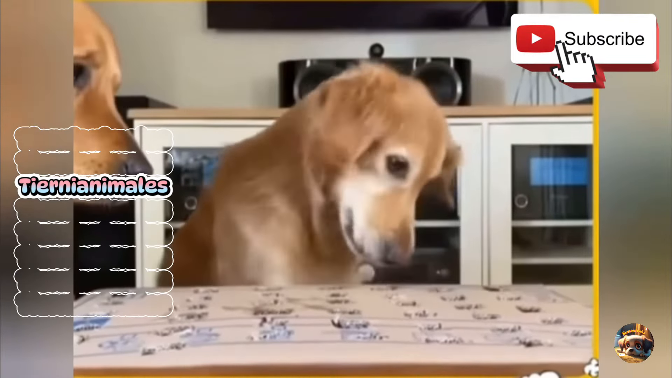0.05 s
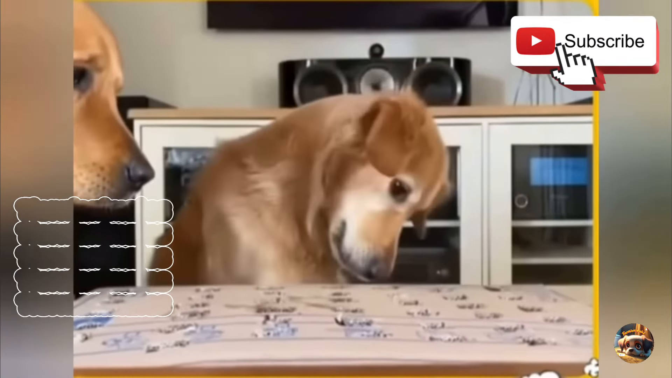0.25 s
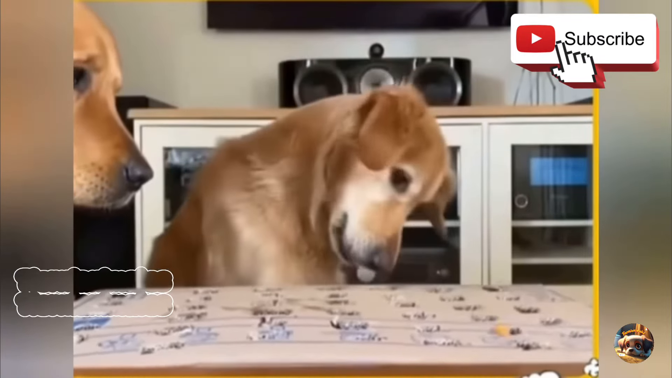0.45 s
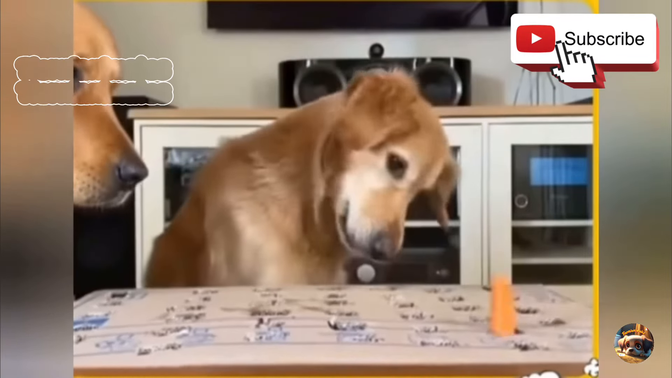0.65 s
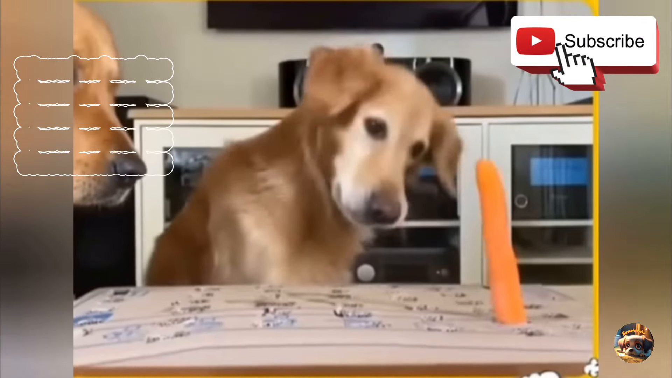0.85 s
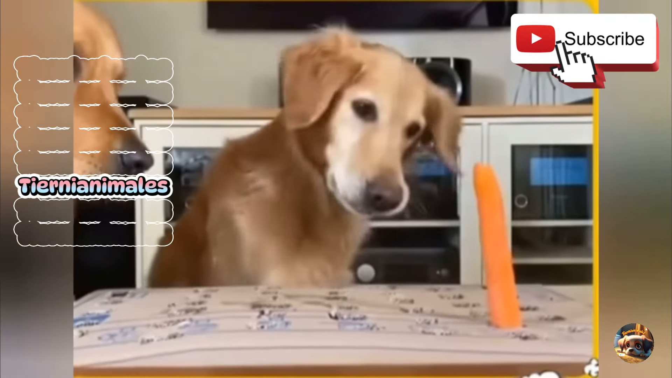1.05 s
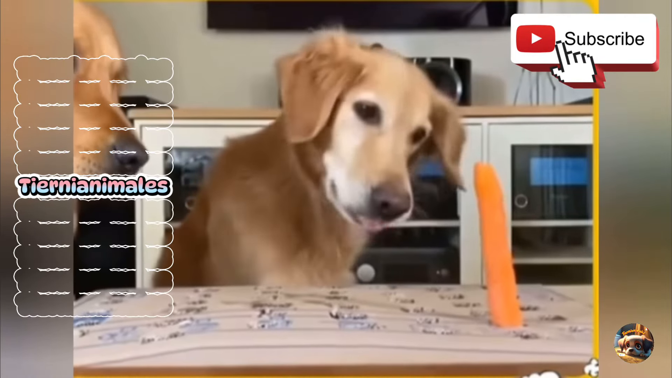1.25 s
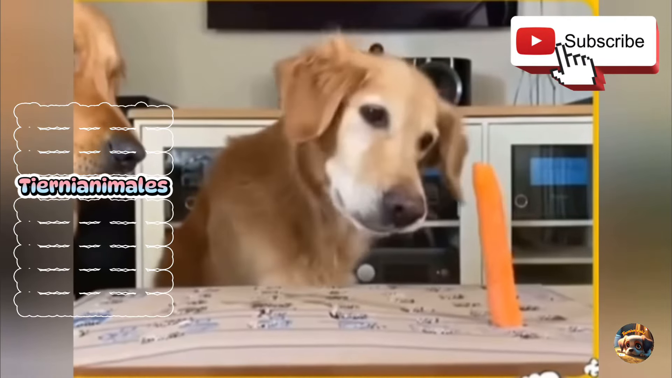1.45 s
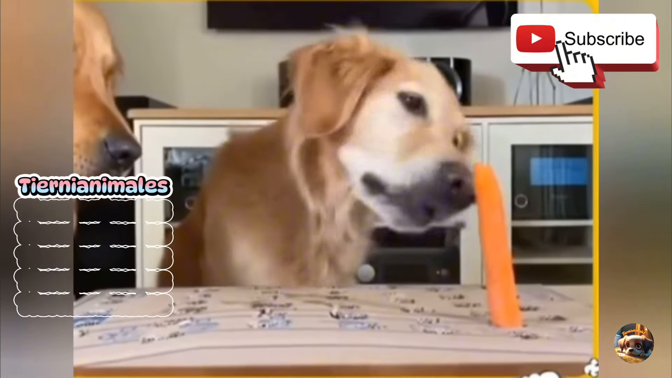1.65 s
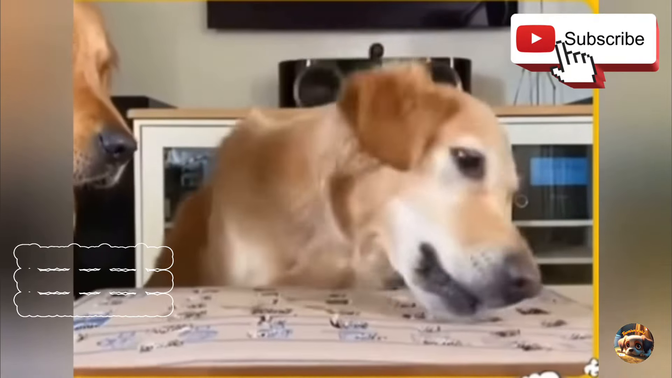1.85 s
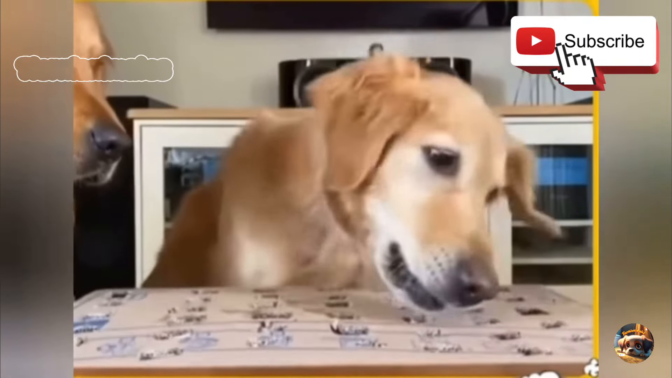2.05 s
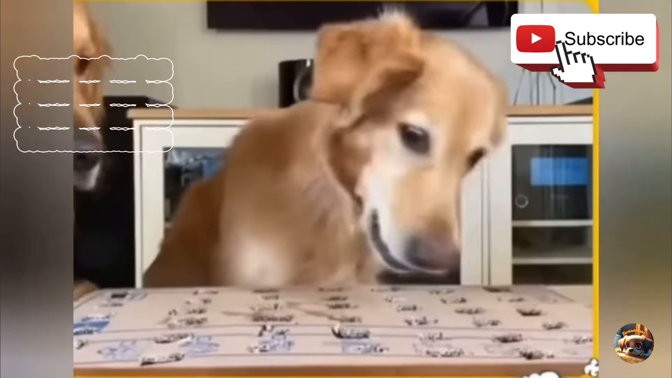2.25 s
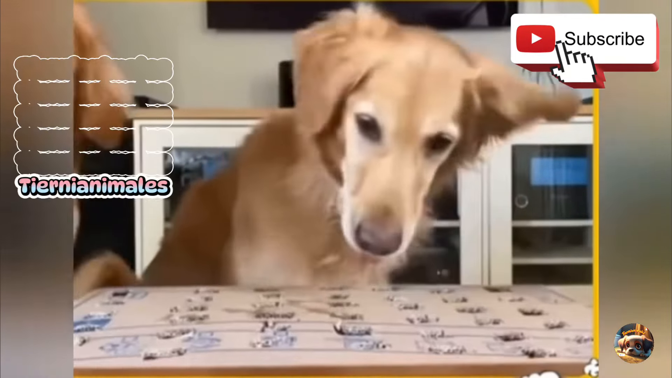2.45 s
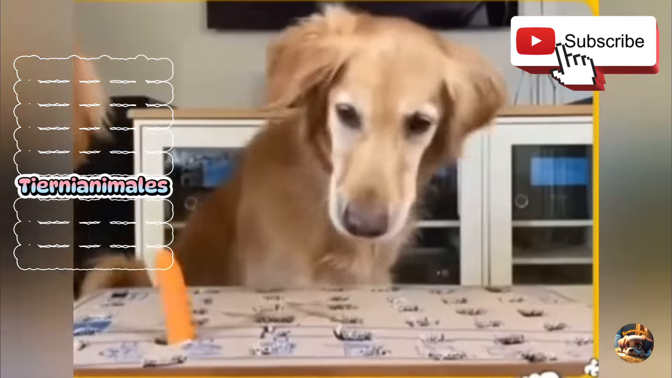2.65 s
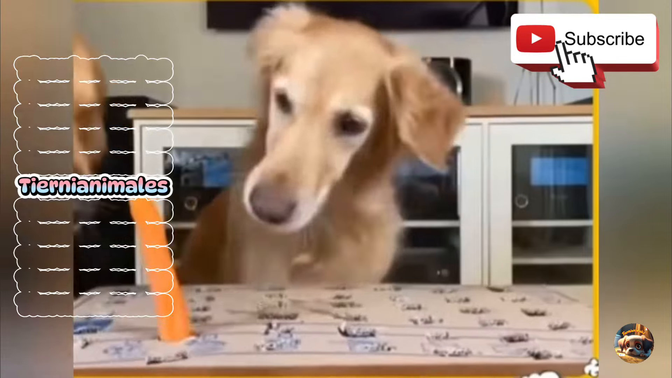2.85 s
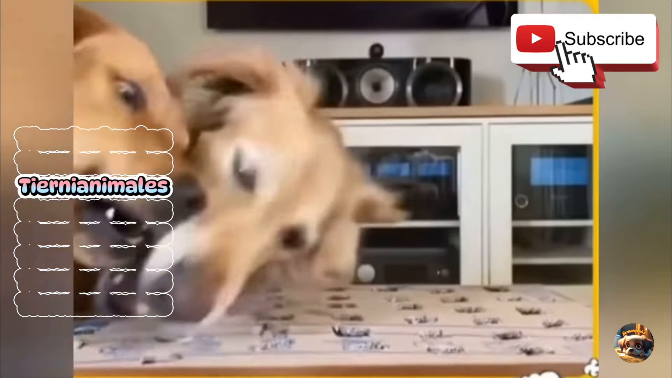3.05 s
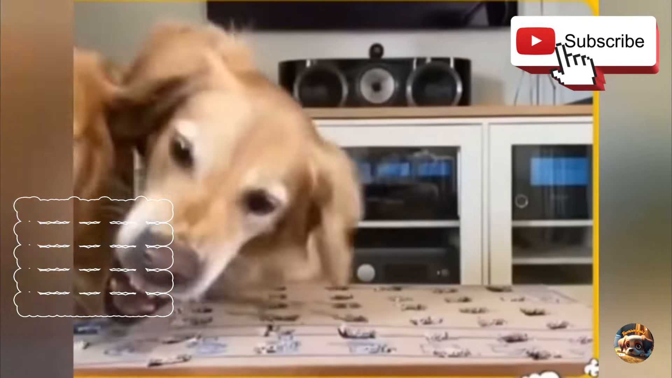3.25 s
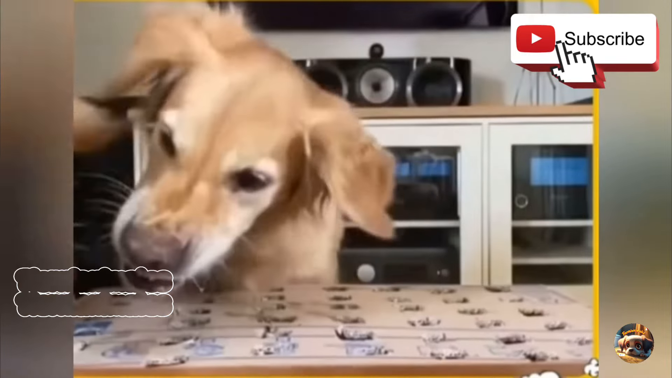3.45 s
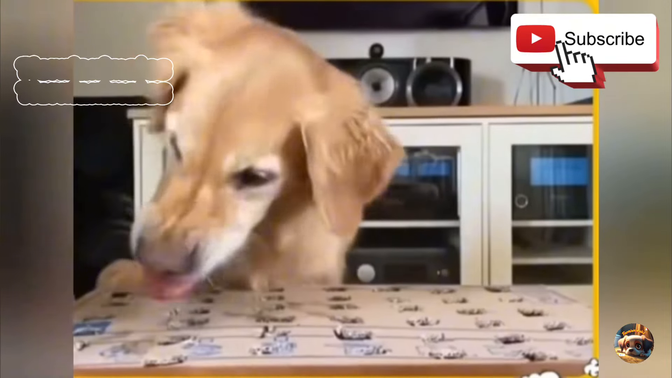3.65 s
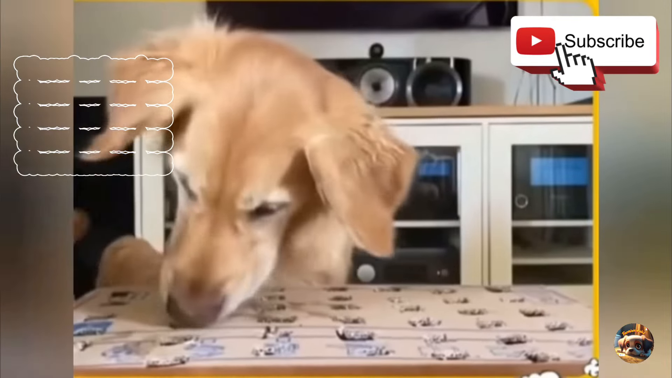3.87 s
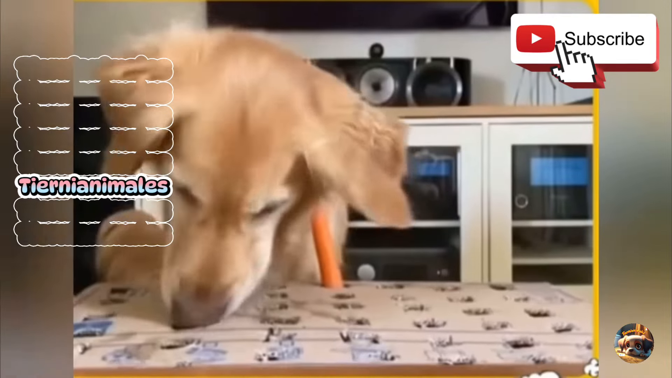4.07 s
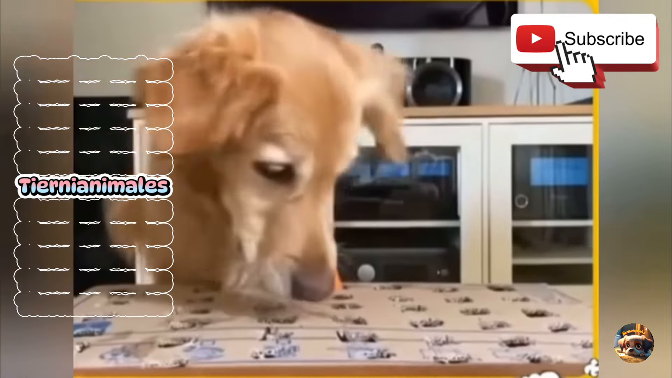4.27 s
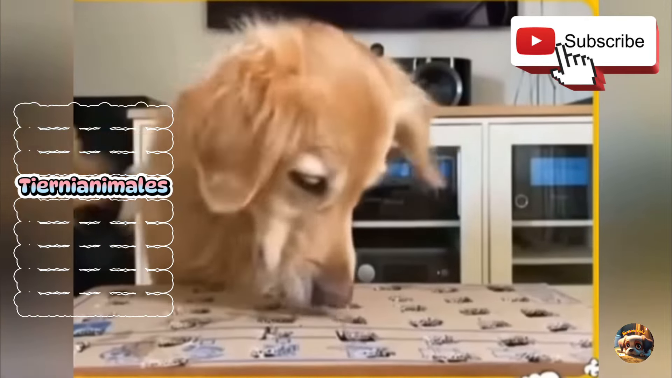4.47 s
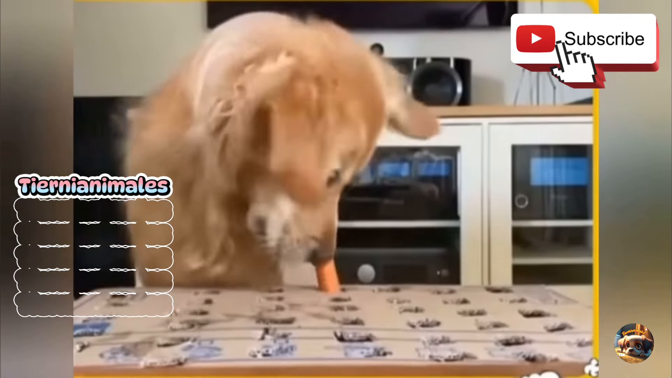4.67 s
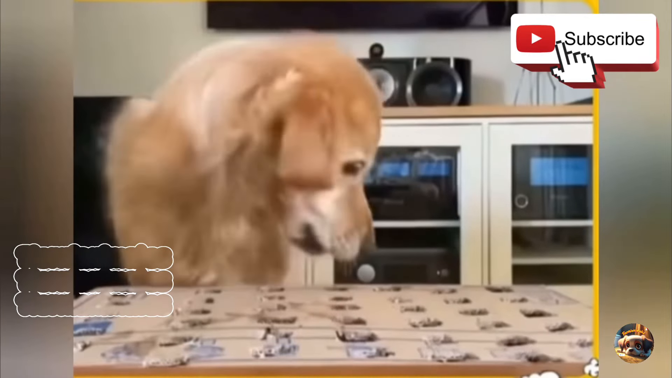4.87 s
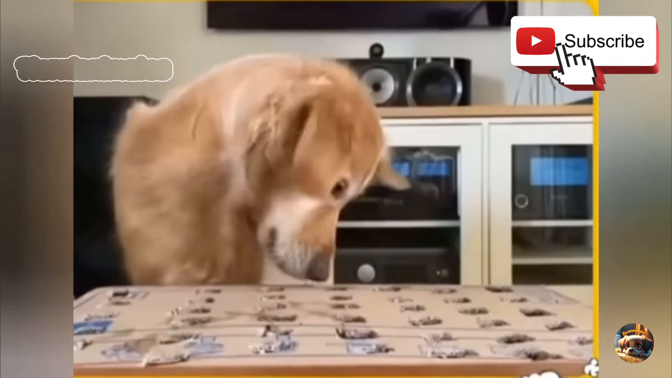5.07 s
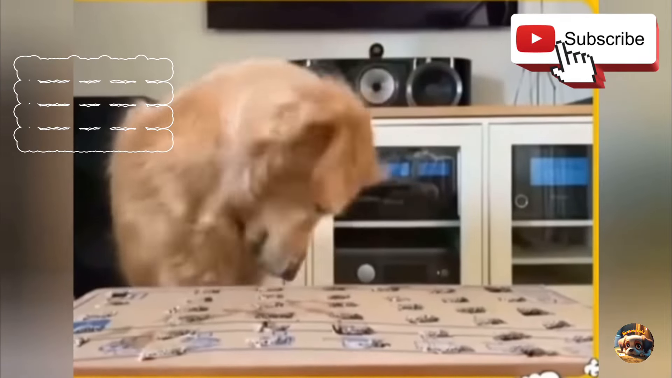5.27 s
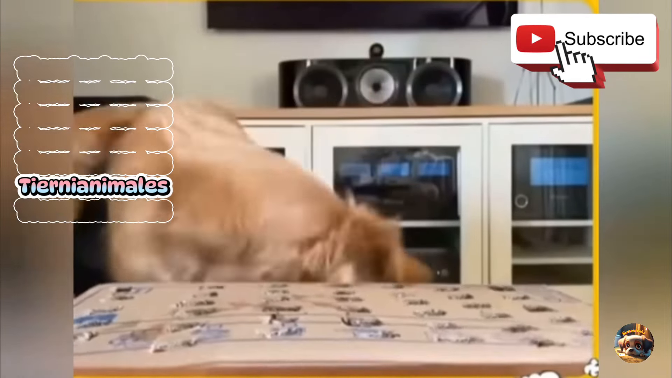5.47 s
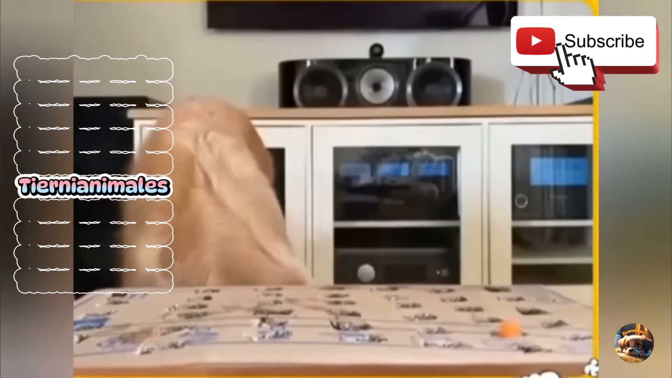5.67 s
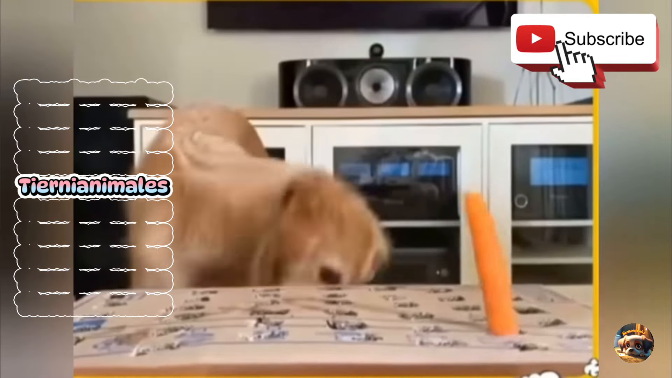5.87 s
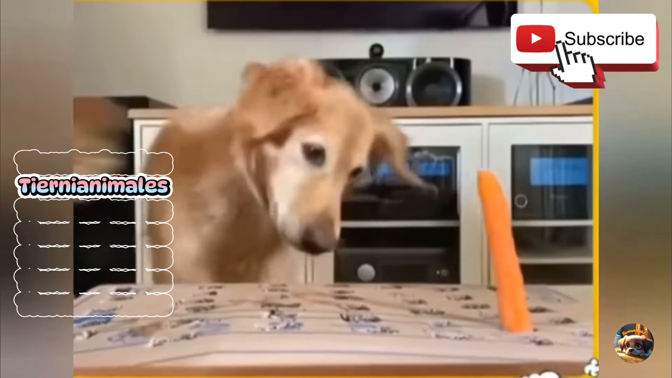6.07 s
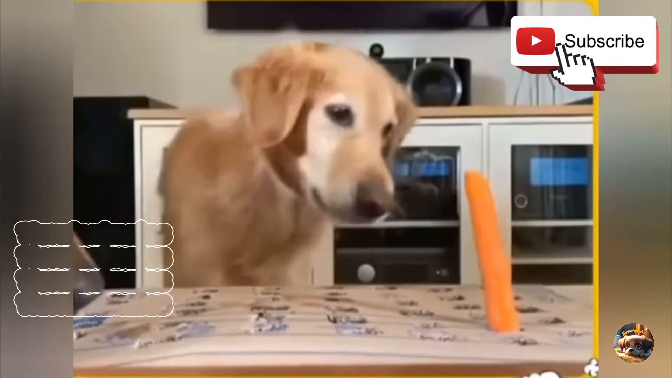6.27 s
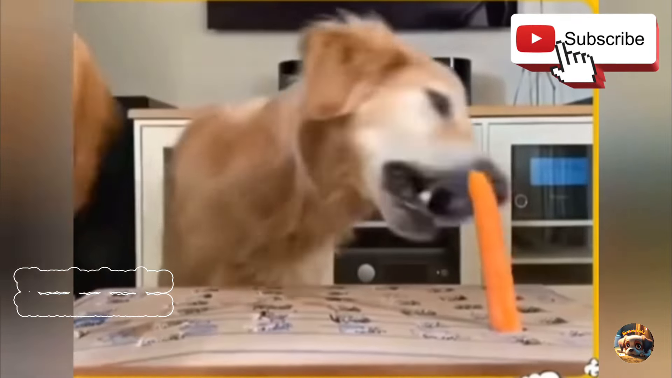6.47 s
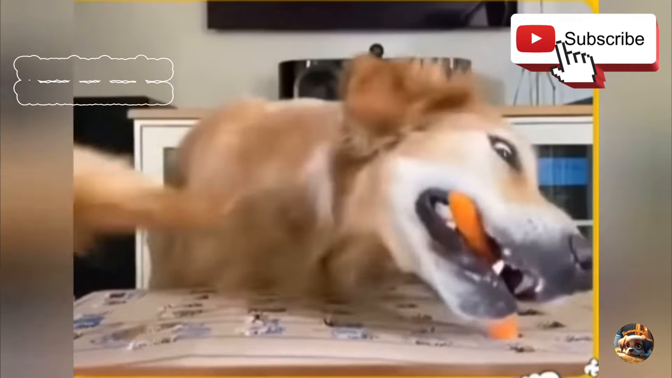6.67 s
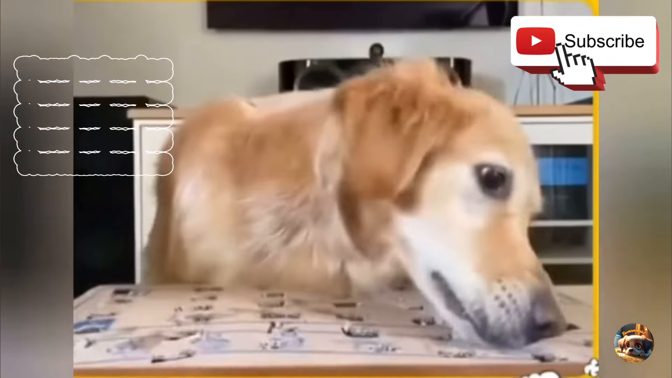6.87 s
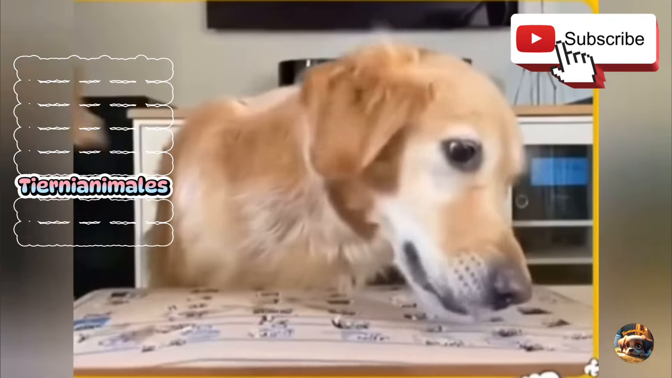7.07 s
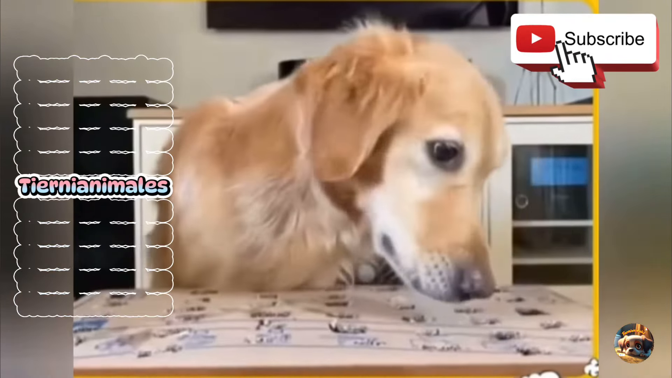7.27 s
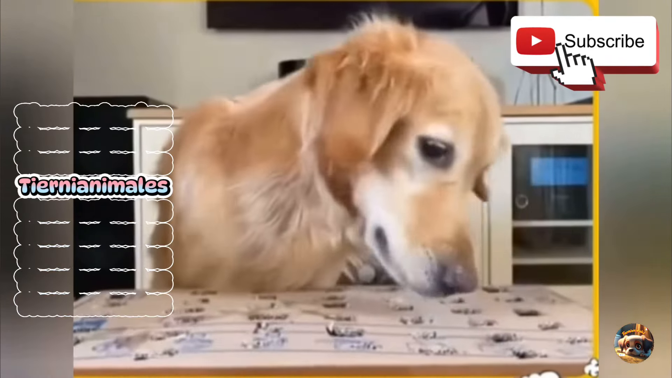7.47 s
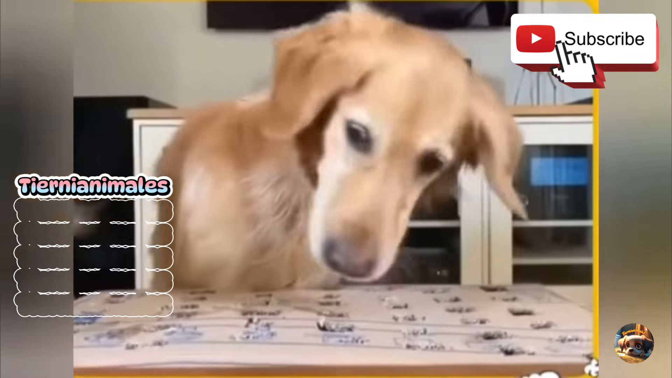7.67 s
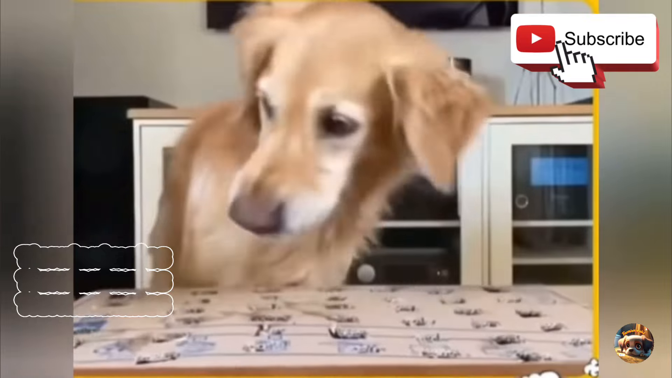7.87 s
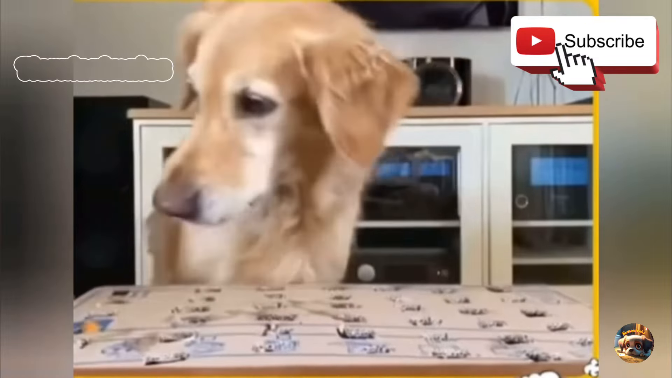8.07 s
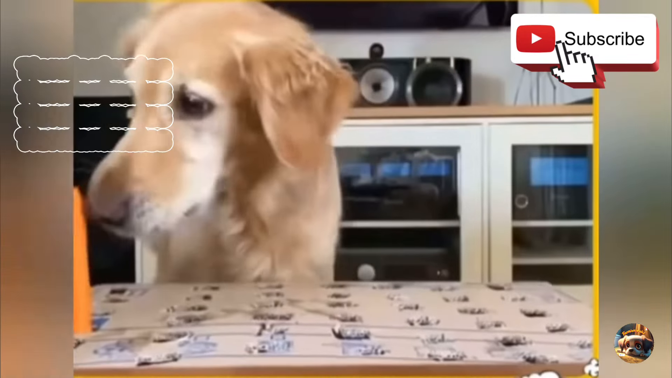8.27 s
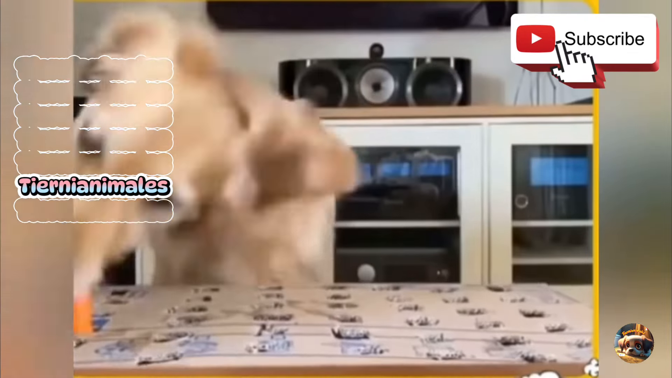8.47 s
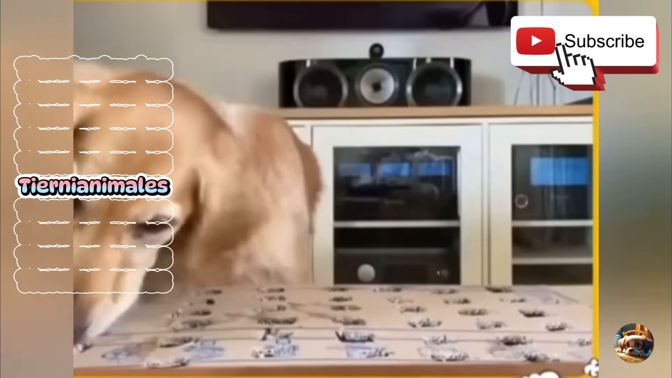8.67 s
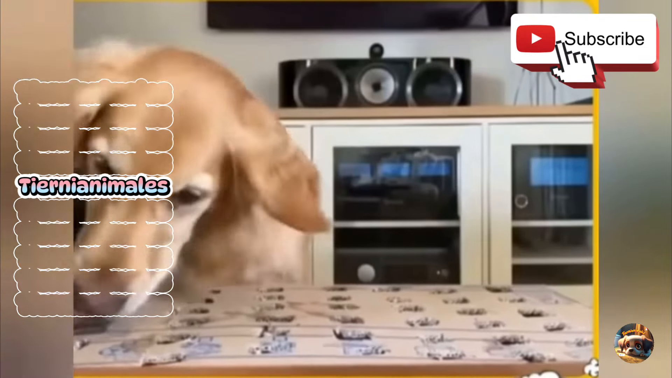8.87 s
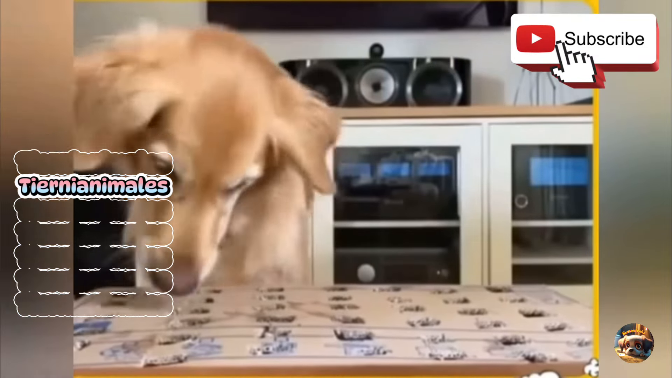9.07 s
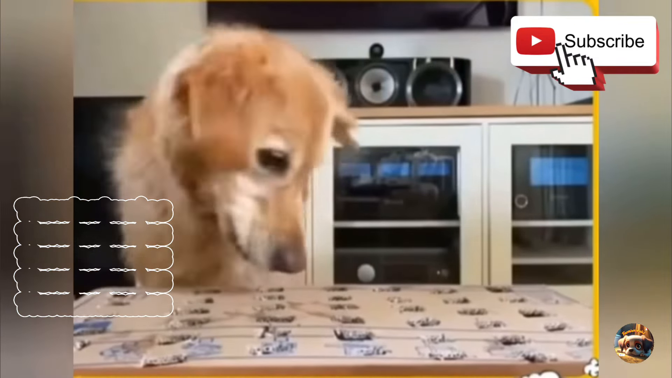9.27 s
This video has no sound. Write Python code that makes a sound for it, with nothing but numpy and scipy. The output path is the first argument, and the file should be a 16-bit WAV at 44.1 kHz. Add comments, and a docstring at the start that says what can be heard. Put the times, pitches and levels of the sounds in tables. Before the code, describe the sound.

Soft thumps, papery rubbing and a few hard snaps on a cardboard box as a dog goes after a carrot in a quietly humming room.

```python
"""A dog noses and paws at a big cardboard box while a carrot is pushed through holes in its lid.
An appliance hums quietly throughout. Shoves and strokes fill the first second, then come in bursts near
1.6, 2.9 and 4 s; hard knocks stand out at 1.6, 4.65 and 6.63 s, and sharp snaps cluster at 8.3 s.
By 9.2 s only a faint stroke and tap remain. Shaped noise makes the shoves, strokes and room air;
decaying sines make the bumps, the rings of the knocks and, undamped, the hum."""
import sys
import numpy as np
from scipy import signal
from scipy.fft import rfft, irfft, next_fast_len
from scipy.io import wavfile
from scipy.ndimage import uniform_filter1d, map_coordinates

SR = 44100
rng = np.random.default_rng(int(sys.argv[2]) if len(sys.argv) > 2 else 0)


def int16_out(signal):
    """Quantize to a 16-bit WAV file."""
    q = np.round(np.clip(np.atleast_2d(signal).T, -1, 1) * 32767)
    wavfile.write(sys.argv[1], SR, q.astype(np.int16))


N = 411007

# room air, relative spectrum: freq_hz, density_db
AIR_SPECTRUM = [(15, -34.5), (40, 4.5), (120, 1), (250, -10), (500, -3), (900, -6), (1200, -12.5),
                (1500, -23.5), (3000, -30.5), (7000, -49), (11000, -33.5), (13500, -57)]
# motor tones, relative levels: freq_hz, level_db
HUM_TONES = [(91.5, -50.5), (366.1, -51.5), (457.6, -62.5), (905, -66)]
# fuzzy drones, relative levels: freq_hz, width_hz, level_db
DRONE_MODES = [(65.6, 7, -13), (111.6, 21, -4), (340.4, 48, -2), (694, 17.8, -13), (803, 15, -19),
               (921, 30, -13.5)]
# left-right correlation of the background: freq_hz, correlation [-1..1]
ROOM_CORRELATION = [(60, 0.82), (180, 0.9), (530, 0.11), (1570, 0.071), (4640, 0.27), (13800, 0.091)]
# room decay: freq_hz, t60_s
ROOM_DECAY = [(150, 0.2), (1000, 0.34), (10000, 0.17)]
ROOM_DB = -13  # room's answer, relative to the contacts

# box resonances as single responses, relative levels: freq_hz, width_hz, level_db
LID_MODES = [(53.6, 41, -0.5), (81, 25, -1.5)]
AIR_MODES = [(107.6, 15.1, -2), (127, 22.4, -1.5), (154.7, 15, -1.5), (186, 12.2, -6.5)]
SIDE_MODES = [(211.5, 32, -2), (263.4, 38, -2.5)]
WALL_MODES = [(302.8, 15.7, -0.5), (360.3, 55.4, -4.5), (458, 32.2, -3.5), (517.4, 32, -4), (678, 184, -9)]
CARD_MODES = [(768, 17, 7.5), (885, 4.1, 14.5), (984, 37, 1.5), (1146, 27, 4), (1348, 38, -2)]
# thin rims of the holes, same columns
RIM_MODES = [(1870, 520, -0.5), (2264, 245, 6), (2640, 910, 0.5), (3645, 470, -3)]
# left-right correlation of the box: freq_hz, correlation [-1..1]
BOX_CORRELATION = [(60, 0.95), (150, 0.99), (350, 0.72), (700, 0.24), (1400, 0.39), (2800, 0.29),
                   (5600, 0.38), (9000, 0.052), (13000, 0.22)]

# soft bumps on a panel or rim: start_s, level_db, pitch_hz, t60_s
BUMPS = [(0.078, -7, 66, 0.15), (0.339, -17, 61.9, 0.11), (0.484, -1.5, 126.6, 0.17),
         (0.598, -11, 117, 0.37), (0.65, -11, 986, 0.055), (1.603, -6, 129, 0.13), (1.638, 5, 137, 0.11),
         (1.681, -13, 151, 0.23), (1.735, -14, 138.6, 0.21), (2.425, -16, 125, 0.085),
         (2.884, -20, 2200, 0.073), (2.894, -4, 134.9, 0.3), (2.91, -19, 2265, 0.11),
         (2.929, 0, 138.8, 0.22), (3.844, -11, 152, 0.13), (4.589, -11.5, 128, 0.17),
         (4.656, -4.5, 126, 0.17), (4.974, -20, 48.4, 0.15), (5.029, -33, 67.3, 0.12),
         (5.08, -20, 54, 0.16), (5.303, -18, 55.5, 0.18), (5.628, -1.5, 180, 0.07), (5.698, -4.5, 117, 0.1),
         (5.738, -6, 57, 0.11), (5.846, -6.5, 162, 0.1), (5.874, -11, 116, 0.12), (6.475, -19, 251, 0.13),
         (6.664, 4.5, 237, 0.11), (7.533, -23, 141, 0.15), (7.975, -23, 325, 0.15),
         (8.02, -14, 295.5, 0.16), (8.038, -9, 61.5, 0.1), (8.052, -14, 464, 0.13), (8.085, -9.5, 152, 0.3),
         (8.211, -17, 516, 0.17), (8.421, -14, 129, 0.087), (8.528, -5.5, 306, 0.3)]
BUMP_RISE_S = 0.0098  # time constant

# sharp contacts: start_s, level_db, pitch_hz, then relative to level_db: rim_db, crack_db, thud_db
KNOCKS = [(0.326, -30, 630, -13, -14, -8), (1.548, -27, 965, -19.5, -24, -6),
          (1.599, -18.5, 1090, 1, 3, 3.5), (1.856, -31, 585, -31, -32, 0), (2.404, -28, 603, -20, -31, -12),
          (2.724, -37, 530, -16, 0, 12.5), (2.839, -29.5, 750, -27, -31, -16),
          (2.863, -27, 647, -12, -10, 6.5), (2.893, -20, 830, -7, -17, -8),
          (2.914, -22.5, 855, -19, -2, -7), (2.992, -36, 845, -23, 6, -11),
          (3.731, -34, 548, -36, -43, -43), (4.59, -28.5, 526, -32, 1.5, -9),
          (4.6473, -12, 2170, -10, -16, 0), (4.757, -26, 1115, -28, -1.5, 4),
          (5.116, -33, 633, -29, -30, -3), (5.445, -35, 520, -3, -12, 5), (5.624, -21, 523, -6, -15, 9),
          (5.677, -24, 757, -2, -26, 5), (5.752, -17.5, 536, -8, -28, 3.5),
          (5.766, -17.5, 965, -5, -26, -8), (5.844, -18.5, 713, -10, -25, -2),
          (5.972, -30.5, 548, 2, -15, -1), (6.24, -28.5, 690, -22, -30, -4),
          (6.31, -32, 720, -16.5, -19, 2), (6.333, -27.5, 736, -12, -26, -8),
          (6.474, -31.5, 716, -12.5, -37, 15), (6.57, -19.5, 783, -14.5, -38, 2),
          (6.632, -8, 1217, -32, -43, 5.5), (7.792, -22, 1320, -13, -24, -5),
          (8.029, -20.5, 570, -38, -27, -8), (8.311, -13.5, 1460, -1, -13, -21),
          (8.315, -17, 1395, -3.5, -4.5, -14), (8.327, -10, 778, -25, -34, -32),
          (8.405, -22, 666, -13, -3, -4), (9.178, -38, 655, -28, -47.5, -3)]
# crack, relative spectrum: freq_hz, density_db
CRACK_SPECTRUM = [(2060, -70), (3500, 3), (5380, -4.5), (6360, 4.5), (8400, -5), (11500, 3.5), (14300, -29)]
# stiff rim struck hard, relative levels: freq_hz, level_db, t60_s
SNAP_MODES = [(2315, -1, 0.016), (3000, -9, 0.0081), (3544, -4, 0.035), (4550, -3, 0.012),
              (5400, -12, .012), (6900, -14, 0.013)]
RING_RISE_CYCLES, RING_T60_CYCLES = 1.56, 35  # rise time constant, 60 dB decay

# strokes over the card: full_force_s, swell_s, hold_s, scrape_db, then relative to it: rim_db, hiss_db
RUBS = [(0.0, 0.012, 0.0054, -47.5, -6, -7), (0.055, 0.023, 0.017, -45.5, -6.5, -4),
        (0.324, 0.12, 0.047, -44.5, -13.5, -9), (0.459, 0.038, 0.029, -34.5, -8, -7.5),
        (0.557, 0.2, 0.0094, -33, -7.5, -3.5), (0.561, 0.079, 0.086, -28.5, -10, -11),
        (1.56, 0.033, 0.051, -34, -9.5, -8), (1.6, 0.015, 0.008, -24, -6, -5),
        (1.774, 0.01, 0.071, -61, -6, 0.5), (1.856, 0.042, 0.059, -40, -7.5, -17),
        (1.948, 0.2, 0.083, -52, -7, -4.5), (2.424, 0.079, 0.025, -41.5, -6.5, -4),
        (2.504, 0.022, 0.091, -40, -7, -5), (2.618, 0.061, 0.028, -37, -7.5, -4),
        (2.72, 0.089, 0.003, -41.5, -8.5, -8), (2.875, 0.059, 0.03, -42, 1, -19),
        (2.91, 0.082, 0.0091, -23.5, -9.5, -6), (3.033, 0.302, 0.13, -51, -8, -4),
        (3.343, 0.039, 0.12, -67, -1, 0), (3.543, 0.029, 0.013, -60.5, -1.5, 6.5),
        (3.884, 0.092, 0.042, -29, -10, -7.5), (3.946, 0.28, 0.058, -34.5, -5, -4.5),
        (4.164, 0.34, 0.014, -50.5, -11, -8.5), (4.32, 0.093, 0.022, -42.5, -12, -16.5),
        (4.442, 0.3, 0.078, -56, -14, -9.5), (4.595, 0.045, 0.011, -32.5, -5.5, -2),
        (4.645, 0.011, 0.003, -26.5, -4, -13), (4.758, 0.031, 0.0053, -32.5, -11, -11),
        (4.934, 0.4, 0.24, -52, -10.5, -5.5), (5.103, 0.06, 0.16, -53.5, -15, -3.5),
        (5.315, 0.087, 0.048, -51, -8, -5.5), (5.458, 0.094, 0.045, -40.5, -2.5, -7),
        (5.627, 0.014, 0.11, -40, 0, -0.5), (5.78, 0.35, 0.055, -27.5, -10, -11),
        (5.967, 0.093, 0.031, -36.5, -11, -4), (6.236, 0.021, 0.006, -38.5, -25, -30),
        (6.345, 0.29, 0.016, -41.5, -9.5, -11.5), (6.488, 0.14, 0.012, -36, -12.5, -18),
        (6.583, 0.17, 0.003, -34.5, -7, -5.5), (6.639, 0.059, 0.0041, -22, -4.5, -8),
        (6.773, 0.057, 0.14, -51, -6, -3), (7.066, 0.99, 0.21, -55.5, -9, -6.5),
        (7.428, 0.19, 0.12, -41, -9, -3), (7.62, 0.059, 0.19, -46, -9.5, -3.5),
        (7.798, 0.14, 0.003, -34, -6.5, -10), (7.988, 0.46, 0.026, -41, -8, -9.5),
        (8.036, 0.098, 0.065, -37.5, -14.5, -9), (8.189, 0.14, 0.047, -33.5, -9, -7),
        (8.309, 0.0043, 0.031, -28, -13, -13), (8.404, 0.012, 0.056, -31, -10, -10.5),
        (8.529, 0.096, 0.043, -27, -7, -7.5), (8.751, 0.074, 0.0043, -43.5, -15, -13),
        (9.156, 0.086, 0.028, -65.5, -16.5, 1.5)]
# noise of the strokes, relative spectra: freq_hz, density_db
SCRAPE_SPECTRUM = [(350, -44), (600, -4.5), (1000, -7), (1600, -13), (2200, -38.5), (5000, -65)]
HISS_SPECTRUM = [(2240, -22.5), (3800, 0), (6520, -4.5), (7160, -2.5), (8570, -5), (12000, -1.5),
                 (12700, -18), (13600, -47)]
SCRAPE_FALL_DB_PER_S, RIM_FALL_DB_PER_S, HISS_FALL_DB_PER_S = 180, 217, 217

# pushes: full_force_s, swell_s, hold_s, air_db, then relative to it: lid_db, side_db, wall_db (end walls)
SHOVES = [(0.0, 0.012, 0.0074, -31.5, 5, -2, -6), (0.065, 0.027, 0.026, -27, 3, -8.5, -12.5),
          (0.341, 0.059, 0.0028, -21.5, -8, -10, -8), (0.484, 0.022, 0.047, -20.5, -35.0, -14, -28),
          (0.561, 0.19, 0.006, -20.5, 2, -2, -4.5), (0.617, 0.16, 0.042, -13.5, -9.5, -13, -12.5),
          (1.565, 0.04, 0.059, -34.5, -9.5, -3, 2.5), (1.618, 0.054, 0.026, -15, -1.5, -10.5, -6.5),
          (1.867, 0.043, 0.047, -37.5, 1.5, -16, -2), (1.944, 0.04, 0.0044, -30, -10, -12, -13),
          (2.415, 0.024, 0.016, -25.5, -27, -7.5, -3), (2.445, 0.13, 0.085, -26.5, -8, -22, -16),
          (2.567, 0.059, 0.12, -27, -5, -9, -9), (2.904, 0.061, 0.055, -20.5, -3.5, -2, -3.5),
          (3.839, 0.047, 0.083, -20.5, -4, -14.5, -10.5), (3.906, 0.17, 0.11, -27, -10, -3.5, -0.5),
          (4.318, 0.15, 0.11, -39.5, -0.5, -10, -3), (4.587, 0.024, 0.039, -24.5, -4, -15, -10),
          (4.655, 0.065, 0.013, -14, -2, -10.5, -8), (4.979, 0.073, 0.033, -49.5, 11, 2.5, -6),
          (5.066, 0.12, 0.022, -48.5, 17.5, 4.5, -4), (5.145, 0.1, 0.11, -45.5, -8, -7, 2),
          (5.298, 0.022, 0.038, -33, 8, -11.0, -11.5), (5.45, 0.097, 0.069, -38, -2, -9, 3.5),
          (5.634, 0.017, 0.028, -19.5, -21, -8, -11), (5.767, 0.31, 0.015, -21, 2, -4, -8),
          (5.859, 0.098, 0.027, -17.5, -5.5, -11.5, -10.5), (5.983, 0.056, 0.0048, -40, 2, 0, 1),
          (6.155, 0.61, 0.25, -49, -13, -3.5, 7.5), (6.494, 0.039, 0.0092, -26.5, -4, 2, -4.5),
          (6.567, 0.038, 0.0093, -26, -15, -6, 0), (6.644, 0.0089, 0.031, -13.5, -7, -2, -9.5),
          (7.09, 0.33, 0.13, -44.5, 6, 0.5, -3), (7.23, 0.56, 0.31, -47, -8, 3.5, 3),
          (7.542, 0.019, 0.018, -30, -13, -7, -10), (7.625, 0.034, 0.084, -31.5, 0, -4.5, -8),
          (7.752, 0.01, 0.078, -29, -11, -4.5, -10.5), (7.987, 0.11, 0.089, -37.5, -21, -3, 8),
          (8.036, 0.17, 0.056, -25, -2.5, -23, -15), (8.203, 0.24, 0.041, -24, -3.5, -7, -0.5),
          (8.416, 0.043, 0.022, -19.5, -22, -9, -5), (8.55, 0.051, 0.0098, -32, -8, -2, 5),
          (8.551, 0.23, 0.03, -19, -2, -3.5, -1), (8.74, 0.082, 0.003, -32.5, -2.5, -6, -7.5)]
AIR_FALL_DB_PER_S, LID_FALL_DB_PER_S = 189, 133
SIDE_FALL_DB_PER_S, WALL_FALL_DB_PER_S = 143, 213

SWELL_DB = 30  # growth over one swell_s
TOP_HZ = 14300


def amp(db):
    """Gain of a level in dB."""
    return 10 ** (np.asarray(db) / 20)


def unit(x):
    """x at rms 1."""
    return x / np.sqrt(np.mean(x ** 2) + 1e-20)


def along(points, hz):
    """Interpolate (freq_hz, value) points on a log frequency axis."""
    f, v = np.transpose(points)
    return np.interp(np.log(hz + 1), np.log(f + 1), v)


def wobble(rate_hz):
    """Smooth random curve through rate_hz knots a second."""
    knots = rng.standard_normal(int(N * rate_hz / SR) + 4)
    return map_coordinates(knots, [np.arange(N) * rate_hz / SR])


def filtered(x, response):
    """x times a complex response of frequency."""
    m = next_fast_len(x.shape[-1] + 8192)
    return irfft(rfft(x, m) * response(np.fft.rfftfreq(m, 1 / SR)), m)[..., :x.shape[-1]]


def modes(table):
    """Causal response of resonances summed with alternating sign."""
    def response(f):
        total = 0
        for k, (center_hz, width_hz, db) in enumerate(table):
            damping = 1j * f * width_hz
            total = total + (-1) ** k * amp(db) * damping / (center_hz ** 2 - f ** 2 + damping)
        return total
    return response


def twice(table):
    """Squared mode response: steeper resonances, dark valleys, level differences in dB doubled."""
    return lambda hz: modes(table)(hz) ** 2


def shape(spectrum):
    """Zero-phase response through (freq_hz, density_db) points."""
    return lambda hz: amp(along(spectrum, hz))


def pair(response, correlation, grit=1):
    """Stereo noise of rms 1 from a random force; grit is the force's unevenness."""
    def mid_side(hz):
        angle = np.arccos(np.clip(along(correlation, hz), -1, 1)) / 2
        return response(hz) * [np.cos(angle), np.sin(angle)]

    force = grit * rng.standard_normal((2, N))
    mid, side = filtered(force, mid_side)
    return unit(np.array([mid + side, mid - side]))


def patchy(x, depth_db, bins, frames):
    """Random gain patches over time and frequency, the same in both channels."""
    z = signal.stft(x, nperseg=512)[2]
    field = uniform_filter1d(rng.standard_normal(z.shape[1:]), bins, 0)
    field = uniform_filter1d(field, frames, 1)
    return signal.istft(z * amp(depth_db * unit(field)), nperseg=512)[1][:, :N]


def swells(full_s, swell_s, hold_s, db, fall_db_per_s):
    """Gain of events that swell, hold and die away; their powers add."""
    step = 32  # samples per control point
    since_s = np.arange(0, N + step, step) / SR - full_s[:, None]
    rising_db = SWELL_DB * np.minimum(since_s, 0) / swell_s[:, None]
    falling_db = fall_db_per_s * np.maximum(since_s - hold_s[:, None], 0)
    gain = np.sqrt(np.sum(amp(db[:, None] + rising_db - falling_db) ** 2, axis=0))
    return np.interp(np.arange(N) / step, np.arange(len(gain)), gain)


def appliance():
    """Slightly unsteady motor tones, fuzzy drones and the air of the room."""
    t = np.arange(N) / SR
    tones = 0
    for hz, db in HUM_TONES:
        level = amp(db + 2.0 + 2.5 * wobble(6.2))
        tones = tones + level * np.sin(2 * np.pi * hz * t + 1.24 * wobble(2.4))
    drones = amp(-50.0) * pair(modes(DRONE_MODES), ROOM_CORRELATION)
    air = amp(-53.0 + 3.6 * wobble(4.2)) * pair(shape(AIR_SPECTRUM), ROOM_CORRELATION)
    return tones + drones + air


def room(x):
    """Reverberation: a noise tail whose frequencies each die at their own speed."""
    hz, t, z = signal.stft(rng.standard_normal((2, SR // 2)), SR, nperseg=256)
    decay = amp(-60 * t / along(ROOM_DECAY, hz)[:, None])
    tail = signal.istft(z * decay, SR, nperseg=256)[1]
    delayed = np.pad(x, ((0, 0), (300, 0)))  # samples
    return signal.fftconvolve(delayed, tail / np.linalg.norm(tail[0]), axes=1)[:, :N]


def bumps():
    """A nose or paw lands softly: one panel or rim swings at its own pitch and dies away."""
    out, t = np.zeros(N + SR), np.arange(SR // 2) / SR
    rise = 1 - np.exp(-t / BUMP_RISE_S)
    for start_s, db, hz, t60_s in BUMPS:
        swing = amp(db - 60 * t / t60_s) * rise * np.sin(2 * np.pi * hz * t)
        out[round(start_s * SR):][:len(t)] += swing
    return out[:N]


def snap_modes(rim_db, t):
    """Decaying sines of a stiff rim, each with a random level offset."""
    out = 0
    for hz, db, t60_s in SNAP_MODES:
        level_db = rim_db + db + rng.normal(0, 2.1)
        out = out + amp(level_db - 60 * t / t60_s) * np.sin(2 * np.pi * hz * t)
    return out


def knocks():
    """Each contact cracks, rings the rims, rings at a pitch of its own and thuds the box."""
    out, t = np.zeros((2, N + SR)), np.arange(SR // 6) / SR
    puffs = rng.standard_normal((len(KNOCKS), 2, len(t)))
    thud = filtered(np.exp(-t / 0.0016), modes(AIR_MODES + SIDE_MODES + WALL_MODES))
    thud = thud / np.abs(thud).max()
    rise = 1 - np.exp(-t / 0.00029)
    fade = amp(4.5 - 60 * t / 0.018)
    for (start_s, db, hz, rim_db, crack_db, thud_db), (mid, side) in zip(KNOCKS, puffs):
        spread = np.array([mid + 0.54 * side, mid - 0.42 * side])
        crack = amp(crack_db - 7.5) * unit(filtered(spread, shape(CRACK_SPECTRUM)))
        rim = amp(rim_db - 22.0) * unit(filtered(spread, modes(RIM_MODES)))
        snap = amp(-4.5) * snap_modes(rim_db, t)
        ring = np.sin(2 * np.pi * hz * t) * amp(3.0 - 60 * t * hz / RING_T60_CYCLES)
        ring = ring * (1 - np.exp(-t * hz / RING_RISE_CYCLES))
        contact = rise * (fade * (crack + rim) + ring + snap) + amp(thud_db - 4.0) * thud
        out[:, round(start_s * SR):][:, :len(t)] += amp(db) * contact
    return out[:, :N] * amp([[1.2], [-1.2]])  # a little to the left


def rubbing():
    """Fibres catch and slip: gritty noise rings card and rims, its colour shifting in random patches."""
    full_s, swell_s, hold_s, scrape_db, rim_db, hiss_db = np.transpose(RUBS)

    def stroke(db, fall_db_per_s):
        return swells(full_s, swell_s, hold_s, scrape_db + db, fall_db_per_s)

    grit = amp(2.2 * wobble(70) + 1.2 * wobble(400))
    card = amp(-2.5) * pair(modes(CARD_MODES), BOX_CORRELATION, grit)
    rough = unit(card + pair(shape(SCRAPE_SPECTRUM), BOX_CORRELATION, grit))
    scrape = stroke(0, SCRAPE_FALL_DB_PER_S) * rough
    rims = stroke(rim_db, RIM_FALL_DB_PER_S) * pair(twice(RIM_MODES), BOX_CORRELATION, grit)
    hiss = stroke(hiss_db, HISS_FALL_DB_PER_S) * pair(shape(HISS_SPECTRUM), BOX_CORRELATION, grit)
    return patchy(scrape + rims + hiss, 2.6, bins=3, frames=6)


def shoving():
    """An uneven force shakes the lid, the enclosed air and the walls at their resonances."""
    full_s, swell_s, hold_s, air_db, lid_db, side_db, wall_db = np.transpose(SHOVES)
    jerk = amp(2.8 * wobble(40))

    def shaken(table, db, fall_db_per_s):
        push = swells(full_s, swell_s, hold_s, air_db + db, fall_db_per_s)
        return push * pair(twice(table), BOX_CORRELATION, jerk)

    lid = shaken(LID_MODES, lid_db, LID_FALL_DB_PER_S)
    air = shaken(AIR_MODES, 0, AIR_FALL_DB_PER_S)
    sides = shaken(SIDE_MODES, side_db, SIDE_FALL_DB_PER_S)
    walls = shaken(WALL_MODES, wall_db, WALL_FALL_DB_PER_S)
    return lid + air + sides + walls


def scene():
    """Appliance, contacts with their reverberation, and the box a little to the left."""
    contacts = knocks()
    box = (bumps() + rubbing() + shoving()) * amp([[0.4], [-0.4]])
    return appliance() + amp(ROOM_DB) * room(contacts) + contacts + box


def record(dry):
    """Soft clipping at full scale, then the band limit."""
    soft = dry / (1 + np.abs(dry) ** 6) ** (1 / 6)
    return filtered(soft, lambda hz: hz < TOP_HZ)


dry = scene()
out = record(dry)
int16_out(out)
```